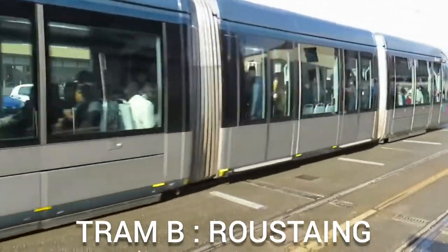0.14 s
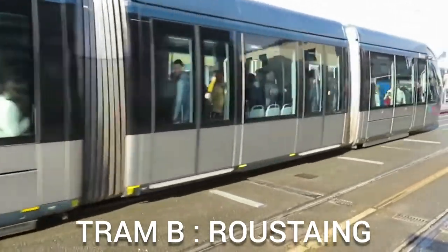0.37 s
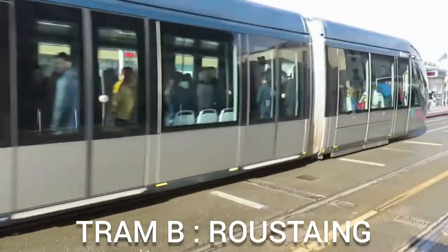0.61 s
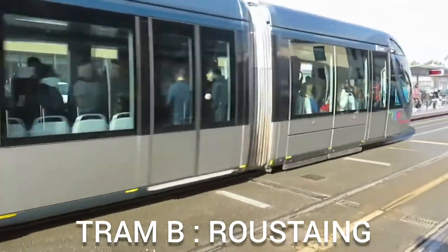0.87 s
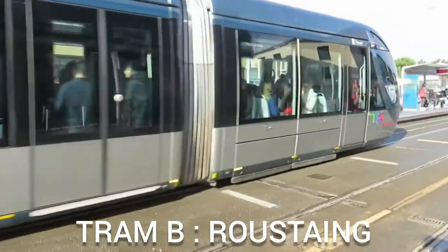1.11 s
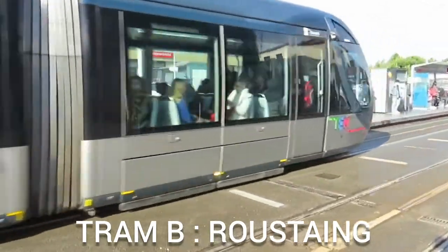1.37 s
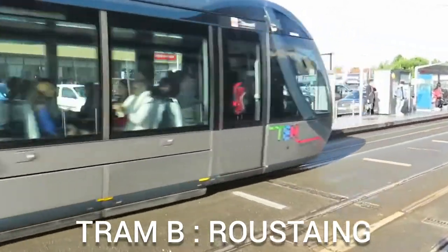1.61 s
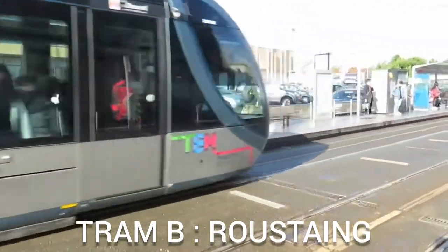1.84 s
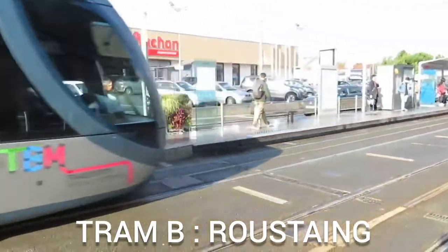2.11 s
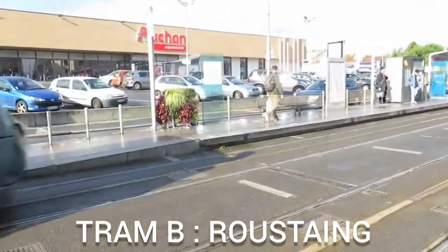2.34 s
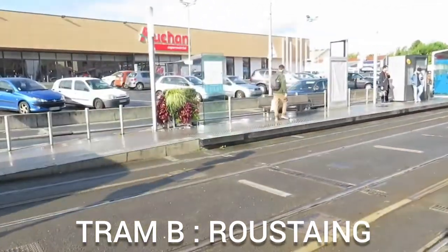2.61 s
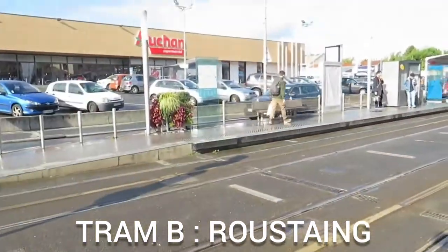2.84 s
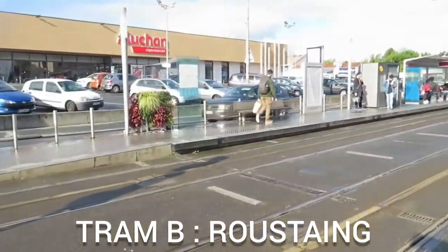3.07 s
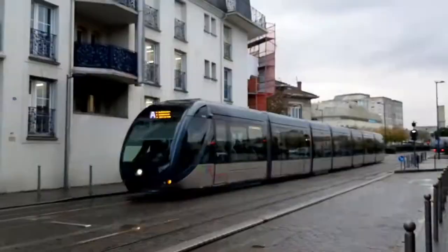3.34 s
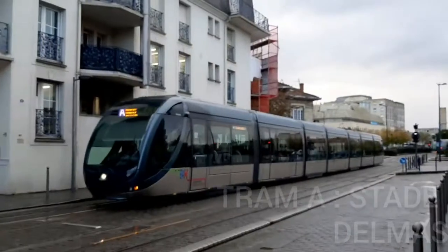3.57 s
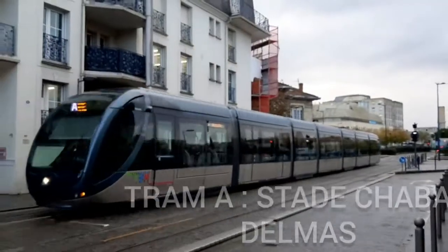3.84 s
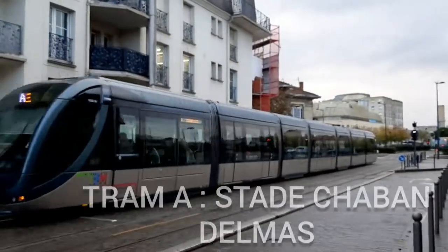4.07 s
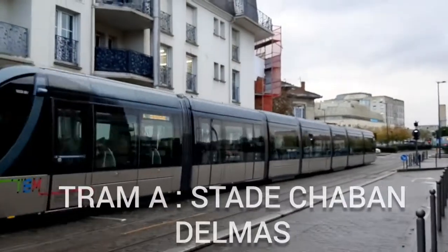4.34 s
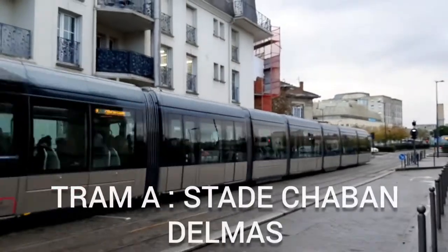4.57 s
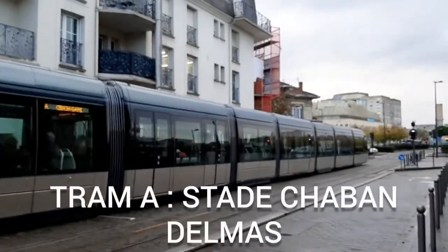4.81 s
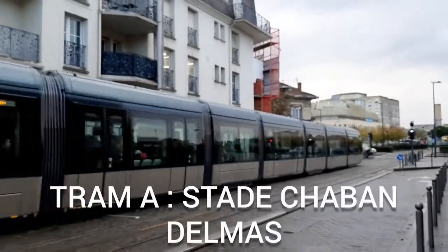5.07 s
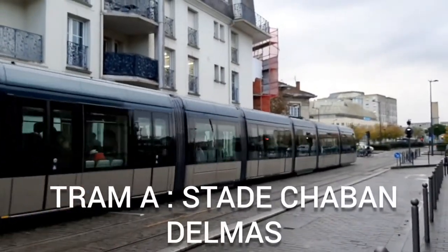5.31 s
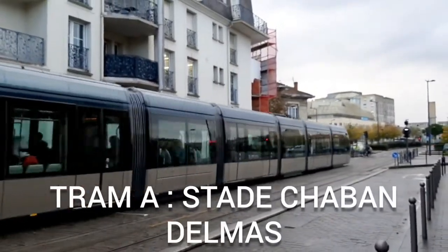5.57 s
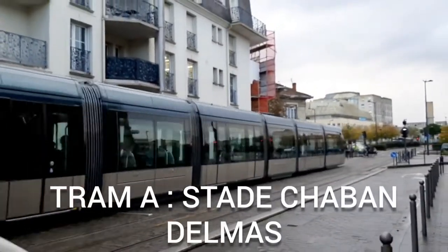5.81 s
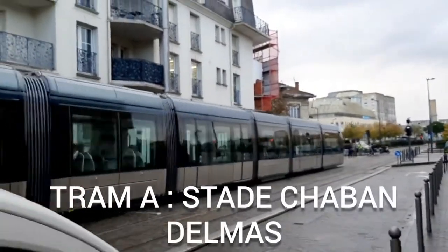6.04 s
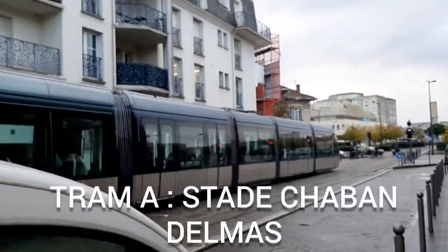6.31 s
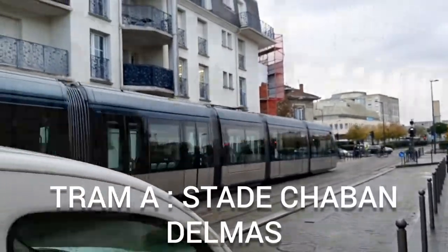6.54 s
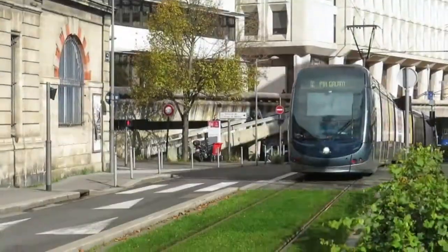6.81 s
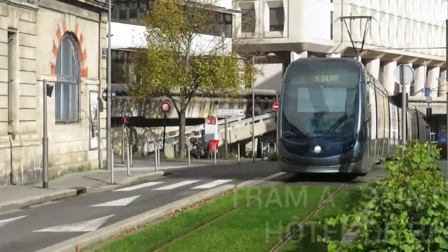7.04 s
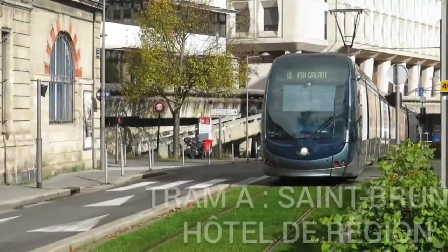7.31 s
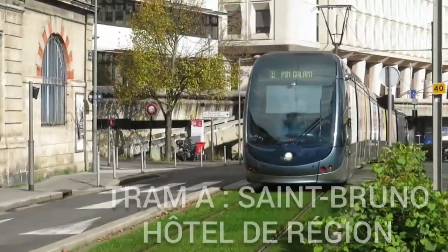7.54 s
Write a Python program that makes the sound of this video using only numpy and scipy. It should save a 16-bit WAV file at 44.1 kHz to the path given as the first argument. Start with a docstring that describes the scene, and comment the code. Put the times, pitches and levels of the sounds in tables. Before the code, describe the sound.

From the start a tram passes very close: deep ground rumble, heaving low boom, rough rolling and several thin, wavering whines between about 2.4 and 4 kHz. A short wheel squeal near 1.3 kHz peaks around 0.8 s and lingers weakly; a lower chirp comes at 1.9 s. The ground rumble drops after 1.65 s, and a rough mid-low drone stands out from 2.1 s while the boom swells near 3 s. At 3.2 s it fades quickly into a smoother, quieter tram with low hum, faint whistle and uneven boom surges. Light ticks and a metallic shiver come near 4.1-4.3 s, a sharper tick at 5.9 s, then more shivers. Around 6.6 s strong wind thumps the microphone, peaking near 6.8 s, then thinning to scattered bumps until 7.3 s. Beneath, soft rolling and a very high, rough whine grow until the cut at about 7.7 s.

```python
"""Three trams in three streets

A tram rolls past close by and pulls away; a second glides along a wet street with a humming drive and small
ticks; a third nears slowly over turf while gusts buffet the microphone. The streets cross-fade.
Rolling is noise shaped by resonances and split into flickering bands; whines and squeals are wavering sines;
wind is low noise plus single pushes. Two close microphone ports make the stereo.
"""
import sys
import numpy as np
from scipy import signal
from scipy.fft import rfft, irfft, next_fast_len
from scipy.io import wavfile
from scipy.ndimage import uniform_filter1d

SR = 44100
rng = np.random.default_rng(int(sys.argv[2]) if len(sys.argv) > 2 else 0)


def dump_mix(stems):
    """Bounce the given channels to the path in sys.argv[1] as a 16-bit WAV at rate SR."""
    frames = np.atleast_2d(stems).T  # one column per channel
    limited = np.clip(frames, -1, 1)  # hard clip at full scale
    pcm = np.round(limited * 32767).astype(np.int16)
    wavfile.write(sys.argv[1], SR, pcm)


def ratio(d):
    """dB to gain"""
    e = np.asarray(d, float) / 20
    return 10 ** e


N = 337806
T = np.arange(N) / SR  # time of every sample in seconds


def level(x, db):
    """Scale a sound to an rms level."""
    return x * ratio(db) / np.sqrt(np.mean(x ** 2))


def curves(table):
    """Draw each column of a table as a curve over time; the first column is seconds."""
    s, *columns = np.transpose(table)
    return [np.interp(T, s, column) for column in columns]


def over(hz, table):
    """Draw each column of a table as a curve over frequency; the first column is Hz."""
    at, *columns = np.transpose(table)
    return [np.interp(np.log(hz + 1), np.log(at), column) for column in columns]


def walk(rate, size):
    """Random levels with a spread near 1, new ones rate times a second, joined smoothly."""
    k = int(SR / rate)
    steps = np.repeat(rng.standard_normal(size // k + 1), k)
    return 1.3 * uniform_filter1d(uniform_filter1d(steps, k), k)[:size]


def noise(low_hz, high_hz, order):
    """A band of noise with rms 1."""
    band = signal.butter(order, [low_hz, high_hz], "bandpass", fs=SR, output="sos")
    return level(signal.sosfilt(band, rng.standard_normal(N)), 0)


def ports(total, diff):
    """Left and right ports from their sum and difference."""
    return np.array([total + diff, total - diff])


def panned(x, pan_db):
    """Place a sound by making the left port pan_db louder than the right."""
    return x * ratio(np.array([[pan_db], [-pan_db]]) / 2)


def bursts(rows, edge_s, tail_s):
    """Bursts that rise, hold and fall more slowly, added by power: rows of start, length, dB."""
    power = 0
    for start, length, db in rows:
        rise = (T - start) / edge_s
        fall = (start + length - T) / tail_s + .5
        shape = np.clip(np.minimum(rise, fall), 0, 1) ** 2
        power = power + (ratio(db) * shape) ** 2
    return np.sqrt(power)


def rolling(span, loud, bands, colour, diff_colour, diff_db, link, ring,
            flicker_db, flicker_rate, grain_db, high_wobble_db):
    """Wheel and rail roughness rings the resonances; each half-octave band follows the pass and flickers alone."""
    a, b = int(span[0] * SR), min(int(span[1] * SR), N)
    size = next_fast_len(b - a)
    hz = np.arange(size // 2 + 1) * SR / size
    rough, other = rfft(rng.standard_normal((2, size)) * ratio(grain_db * walk(120, size)))
    boost = ratio(sum(db / (1 + (2 * (hz - f) / width) ** 2) for f, width, db in ring))
    # the difference is partly the same roughness, partly noise of its own
    same, late = over(hz, link)
    free = np.sqrt(np.clip(1 - same ** 2 - late ** 2, 0, 1))
    total = boost * ratio(over(hz, colour)[0]) * rough
    diff_gain = boost * ratio(over(hz, diff_colour)[0] + diff_db)
    diff = diff_gain * ((same - 1j * late) * rough + free * other)
    pair = ports(total, diff)
    # what each named band must gain to reach its loudness
    rms = [np.sqrt(2 * np.sum(abs(total[(hz > lo) & (hz < hi)]) ** 2)) / size for lo, hi in bands]
    gain_db = np.array([curve[a:b] - 20 * np.log10(r) for curve, r in zip(loud, rms)])
    centres = np.log2([np.sqrt(lo * hi) for lo, hi in bands])
    out = np.zeros((2, N))
    for octave in np.arange(4.5, 14.1, .5):
        # overlapping windows, centred on 2 ** octave Hz
        window = np.cos(np.pi * np.clip(np.log2(hz + 1) - octave, -.5, .5)) ** 2
        weights = np.array([np.interp(octave, centres, row) for row in np.eye(len(bands))])
        db = weights @ gain_db + flicker_db * walk(flicker_rate, b - a)
        # bands above about 5.4 kHz get an extra, faster random wobble in level
        db = db + (octave > 12.4) * high_wobble_db * walk(45, b - a)
        out[:, a:b] += ratio(db) * irfft(window * pair, size)[:, :b - a]
    return out


def tone(table, waver_hz, flutter_db, rate):
    """A sine whose pitch and strength waver, with 0.02 s edges."""
    hz, db = curves(table)
    s = np.transpose(table)[0]
    on = np.clip(np.minimum(T - s[0], s[-1] - T) / .02, 0, 1)
    phase = 2 * np.pi * np.cumsum(hz + waver_hz * walk(rate, N)) / SR
    return on * np.sqrt(2) * ratio(db + flutter_db * walk(rate, N)) * np.sin(phase)


# Loudness of the boom. Each row: time in seconds, lower half in dB, upper half in dB.
FIRST_BOOM = [(0.0, -20, -8), (0.1, -18, -19.5), (0.4, -23, -15), (0.68, -18.5, -20), (1.45, -22, -20),
              (1.64, -18, -22), (1.86, -18.5, -20.5), (2.0, -18, -20), (2.07, -19.5, -31),
              (2.18, -16, -20.5), (2.71, -27, -26), (2.81, -17.5, -23.5), (2.95, -16.5, -30),
              (3.02, -13, -20), (3.15, -12, -28.5), (3.25, -11.5, -19.5)]
# Swell of the rolling as wheel sets come and go. Each row: time in seconds, change in dB.
FIRST_SWELL = [(0, 2.5), (.2, -1.5), (.4, 0), (.7, -2.5), (.95, 0.5), (1.15, 1.2), (1.45, 4.5), (1.95, 0.1),
               (2.4, -1), (2.75, 0.5), (2.9, -0.5), (3.05, -4.5), (3.25, -6)]
# Rolling, rail ring, hiss and top, before swell and air.
# Each row: level at 0 s in dB, share of the swell (a plain factor), drift in dB per second.
FIRST_ROLL = [(-26.5, 0.36, 0.23), (-29, 0.73, -0.3), (-43.5, 1.18, -0.1), (-75.5, 0.51, -0.26)]
# Extra brightness of the top late in the street. Each row: time in seconds, boost in dB.
FIRST_AIR = [(2.75, 5.5), (2.95, 13), (3.1, 13.5), (3.25, 12)]


def first_loudness():
    """The ground rumble drops once the last wheels are by, the boom heaves, one swell moves the rolling."""
    last_wheels_s, drop_s = 1.65, 0.24
    rumble = -29 - 9 * np.clip((T - last_wheels_s) / drop_s, 0, 1)
    air = curves(FIRST_AIR)[0]
    swell = curves(FIRST_SWELL)[0]
    roll, ring, hiss, top = [db + share * swell + drift * T for db, share, drift in FIRST_ROLL]
    # about a quarter of the brightening reaches the hiss
    return [rumble] + curves(FIRST_BOOM) + [roll, ring, hiss + 0.26 * air, top + air]


# Bands whose loudness is set: ground rumble, boom, rolling, rail ring, hiss, top.
# Each row: low edge in Hz, high edge in Hz.
BANDS = [(35, 110), (170, 400), (500, 800), (900, 1800), (2300, 4200), (5000, 8000)]
# The first tram's boom in two halves. Each row: low edge in Hz, high edge in Hz.
BOOM_HALVES = [(170, 260), (270, 420)]
# Colour of the sum and the difference of the ports, before the band levels.
# Each row: frequency in Hz, relative level in dB per Hz.
FIRST_SUM = [(15, -38.5), (25, -21.5), (54, -10), (124, -11.5), (165, -9), (200, 2), (331, -0.5),
             (600, -9.5), (839, -17), (1340, -19), (2070, -29), (2480, -28), (2750, -35.5), (3750, -33),
             (4270, -43), (5300, -45), (5900, -53), (12000, -61), (15600, -110), (22000, -120)]
FIRST_DIFF = [(35, -68), (60, -29.5), (331, -4), (839, -12.5), (1710, -12), (1950, -12.5), (2490, -3.5),
              (2780, -12.5), (3960, -5), (4330, -16.5), (5300, -17.5), (5900, -24.5), (12000, -47.5),
              (15600, -100), (22000, -120)]
# How the difference follows the sum.
# Each row: frequency in Hz, share in phase, share a quarter cycle late (both plain factors).
FIRST_LINK = [(200, -.5, 0.022), (1200, -1, .1), (2000, -.6, .6), (3000, -0.52, .85), (5000, -0.091, .4)]
# Wheel, rail and body resonances. Each row: frequency in Hz, width in Hz, boost in dB.
FIRST_RING = [(608, 190, 3.5), (1085, 320, 3), (1690, 60, 5), (2510, 300, 5), (3500, 120, 0)]


def first_rolling():
    """Rough wheels close by drive a booming body and the rails."""
    return rolling((0, 3.4), first_loudness(), BANDS[:1] + BOOM_HALVES + BANDS[2:],
                   FIRST_SUM, FIRST_DIFF, -18.5, FIRST_LINK, FIRST_RING,
                   flicker_db=1.6, flicker_rate=9.08, grain_db=1.0, high_wobble_db=2.5)


# In the next four tables each row: time in seconds, pitch in Hz, level in dB before flutter and stereo.
# The motor whine sinks as the tram leaves.
MOTOR = [(0, 3950, -58), (1.1, 3960, -62), (1.5, 3965, -52), (1.9, 3925, -57), (2.3, 3880, -58),
         (2.6, 3870, -55), (2.95, 3855, -57), (3.1, 3850, -64)]
# The gear whine sags and returns.
GEAR = [(0, 3655, -49), (.8, 3640, -51), (1.15, 3625, -51), (1.45, 3570, -53), (1.7, 3600, -60),
        (2.35, 3650, -60), (2.55, 3635, -51), (3, 3640, -52), (3.2, 3630, -60)]
# Another whine comes and goes and wanders in pitch.
WANDERING = [(1.44, 3300, -62), (1.5, 3310, -44), (1.56, 3325, -53), (1.8, 3325, -53), (1.9, 3300, -64),
             (2.2, 3270, -60), (2.3, 3270, -51), (2.5, 3400, -60), (2.68, 3475, -50), (3, 3430, -53),
             (3.2, 3400, -58)]
# A narrow rough ring of the wheels drifts in pitch.
WHEEL_RING = [(0, 2500, -52.5), (.4, 2520, -48), (.8, 2500, -54.5), (1.3, 2445, -46), (1.6, 2390, -48.5),
              (2.1, 2454, -47.5), (2.4, 2416, -52), (2.6, 2360, -45), (2.85, 2420, -43.5), (3.2, 2375, -56)]


def first_whines():
    """Motor, gears and wheels sing as wavering sines, stronger in the difference of the ports."""
    whines = tone(MOTOR, 16.0, 5.0, 45) + tone(GEAR, 22.0, 3.0, 110)
    whines = whines + tone(WANDERING, 20.0, 3.0, 80) + tone(WHEEL_RING, 28.0, 3.5, 70)
    return ports(ratio(-5.0) * np.roll(whines, -3), whines)  # the sum leads by 3 samples


# In the next three tables each row: time in seconds, pitch in Hz, level in dB before flutter and panning.
# A brief wheel squeal.
SQUEAL = [(.58, 1300, -48), (.72, 1315, -33), (.8, 1330, -27), (.845, 1335, -42), (.9, 1340, -35),
          (.98, 1345, -50), (1.12, 1365, -40), (1.32, 1330, -41), (1.5, 1360, -38), (1.6, 1360, -52)]
# A shorter, lower squeal from the last wheels.
CHIRP = [(1.82, 1070, -44), (1.88, 1090, -33), (1.92, 1125, -33), (1.96, 1135, -46)]
# A low drone stands out as the tram leaves.
DRONE = [(2.05, 590, -44), (2.25, 600, -33), (2.6, 610, -32), (2.92, 640, -32), (3.05, 600, -38),
         (3.25, 600, -44)]


def first_squeals():
    """Two wheel squeals and a rough drone: sines that waver, a little to the right."""
    squeals = tone(SQUEAL, 6.0, 2.0, 40) + tone(CHIRP, 6.0, 2.0, 40)
    return panned(squeals + tone(DRONE, 40.0, 3.5, 90), -2.5)


# The six bands, rumble to top, before surges. Each row: level at 3.3 s in dB, drift in dB per second.
SECOND_ROLL = [(-41.5, 0.58), (-28, 1), (-36.5, 0.41), (-38.5, 0.31), (-45.5, 0.95), (-54, 0.96)]
# Surges of the boom. Each row: time of the peak in seconds, length in seconds, rise in dB.
SURGES = [(3.522, 0.32, 8), (3.732, 0.097, 8), (4.567, 0.27, 3), (4.952, 0.13, 6.5), (5.153, 0.086, 9),
          (6.34, 0.063, 4)]


def second_loudness():
    """Steady band levels rise slowly; the boom surges now and then."""
    loud = [db + drift * (T - 3.3) for db, drift in SECOND_ROLL]
    loud[1] = loud[1] + sum(db * np.exp(-(2 * (T - s) / length) ** 2) for s, length, db in SURGES)
    return loud


# Colour of the sum and the difference of the ports, before the band levels.
# Each row: frequency in Hz, relative level in dB per Hz.
SECOND_SUM = [(25, -33), (55, -10), (107, -15.5), (165, -7.5), (240, 2), (457, -19), (826, -32.5),
              (1300, -31), (1800, -33), (3800, -34.5), (7300, -41), (8600, -50), (11500, -47.5),
              (15500, -53)]
SECOND_DIFF = [(30, -36), (60, -25), (231, 4), (453, -9), (673, -10.5), (869, -20), (1300, -15.5),
               (1800, -18), (3800, -18.5), (7300, -25.5), (8600, -34.5), (11500, -30.5), (15500, -38.5)]
# How the difference follows the sum.
# Each row: frequency in Hz, share in phase, share a quarter cycle late (both plain factors).
SECOND_LINK = [(100, -0.39, 0.), (450, -0.52, 0.), (737, 0.12, 0.), (1600, -0.16, 0.), (6500, 0.11, 0.),
               (9500, .45, 0.), (15000, .1, 0.005)]
# Wheel, rail and drive resonances. Each row: frequency in Hz, width in Hz, boost in dB.
SECOND_RING = [(229, 75, 4), (1140, 210, 6.3), (1428, 38, 9), (2050, 60, 4), (2410, 160, 11), (2790, 50, 4),
               (3240, 90, 4.5), (3715, 30, 5), (3895, 55, 5), (4260, 110, 3.5)]


def second_rolling():
    """Wheel and rail roughness drives sharper resonances as the tram glides along the wet street."""
    return rolling((3.1, 6.8), second_loudness(), BANDS,
                   SECOND_SUM, SECOND_DIFF, -15.5, SECOND_LINK, SECOND_RING,
                   flicker_db=0.86, flicker_rate=8.8, grain_db=0.53, high_wobble_db=0.76)


# In the next three tables each row: time in seconds, pitch in Hz, level in the sum in dB before flutter.
# The hum of the drive.
HUM = [(3.2, 144, -34), (3.55, 144, -41), (4.1, 144, -34), (4.6, 143, -35), (4.9, 143.9, -63),
       (5.3, 143.4, -37.5), (6.3, 145, -35.5), (6.7, 145, -41)]
# The whistle of the drive.
WHISTLE = [(3.2, 1428, -48), (3.9, 1430, -50), (4.3, 1428, -48), (5.3, 1425, -48.5), (5.9, 1421, -50),
           (6.7, 1422, -50)]
# A thin rail whine comes up late in the street.
RAIL = [(4.7, 2825, -66), (5.1, 2825, -58), (5.6, 2830, -63), (5.95, 2830, -55), (6.4, 2830, -55),
        (6.7, 2830, -62)]


def second_drive():
    """The drive hums near the middle; its whistle and the rail whine spread wide across the ports."""
    hum = tone(HUM, 1.5, 2.0, 10)
    whistle = tone(WHISTLE, 12.0, 3.0, 45) + tone(RAIL, 10.0, 4.0, 30)
    # the difference lags by 60 and 9 samples
    return ports(hum + whistle, ratio(-18.0) * np.roll(hum, 60) + ratio(5.5) * np.roll(whistle, 9))


# Thin high shivers. Each row: start in seconds, length in seconds, envelope level in dB.
SHIVERS = [(4.104, 0.051, -57), (5.91, 0.03, -58), (6.008, 0.12, -58.5), (6.185, .092, -60)]


def shivers():
    """Small loose metal shivers in three narrow high bands over a wide hiss."""
    grain = bursts(SHIVERS, edge_s=.012, tail_s=.02) * ratio(3.0 * walk(90, N))
    rings = noise(13450, 14100, order=2) + ratio(-8.0) * noise(10500, 11300, order=2)
    rings = rings + ratio(-3.5) * noise(15200, 15700, order=2)
    hiss = ratio(-1.0) * noise(8500, 15500, order=2)
    return panned(grain * (rings + hiss), 4.0)


# Small metal ticks nearby. Each row: start in seconds, level in dB before panning, ring pitch in Hz,
# time for the ring to fall 60 dB in seconds, share of ring, left minus right in dB, dullness from 0 to 1.
TICKS = [(4.11, -37, 10440, 0.13, 0.28, 14.5, .6), (4.3018, -39, 12100, .03, 0.23, 9.5, .6),
         (5.8995, -19, 11200, 0.012, 0.12, 3, .88), (6.0375, -36, 13370, .06, .3, 3.5, .6)]


def ticks():
    """Each tick is a sharp crack of noise with a short high ring."""
    out, t = np.zeros((2, N)), T[:4096]
    for s, db, hz, t60, share, pan_db, dull in TICKS:
        grit = rng.standard_normal(4096)
        dulled = signal.lfilter([1], [1, -min(dull, .95)], grit)
        crack = signal.lfilter([1, -1], [1, -.9], dulled)  # takes out the lows
        crack = crack * (1 - np.exp(-t / .0005)) * np.exp(-t / 0.0014)
        crack = crack / np.max(abs(crack))
        # the grit also roughens the ring's pitch
        ring = np.sin(2 * np.pi * hz * t + .12 * np.cumsum(grit)) * np.exp(-np.log(1000) * t / t60)
        i = int(s * SR)
        out[:, i:i + 4096] += panned(ratio(db) * ((1 - share) * crack + share * ring), pan_db)
    return out


# Boom, rail ring and hiss, before the swell. Each row: level at 6.7 s in dB, rise in dB per second.
THIRD_ROLL = [(-58.5, 14), (-64, 16), (-64.5, 9.4)]
# The street swells once the strong wind has passed. Each row: time in seconds, change in dB.
THIRD_SWELL = [(6.75, 1), (6.88, 1), (6.97, 4), (7.25, 4), (7.66, 1)]
# Colour of the sum and the difference of the ports, before the band levels.
# Each row: frequency in Hz, relative level in dB per Hz.
THIRD_SUM = [(24, -52), (40, -13), (120, -11), (391, 0.5), (543, -1), (597, -1), (800, -6), (1020, -1.5),
             (1210, -4.5), (1330, -3.5), (2070, -16), (6870, -37.5), (11000, -55), (14300, -76),
             (22000, -120)]
THIRD_DIFF = [(180, -88), (300, -60), (799, -51), (943, -7), (1180, -9), (5750, -21), (6790, -20),
              (11000, -38), (14300, -52), (22000, -120)]
# How the difference follows the sum.
# Each row: frequency in Hz, share in phase, share a quarter cycle late (both plain factors).
THIRD_LINK = [(2500, 0., 0.1), (5000, 0.0032, .6)]
# Wheel, rail and drive resonances. Each row: frequency in Hz, width in Hz, boost in dB.
THIRD_RING = [(383, 54, 1.9), (613, 62, 2), (1224, 90, 9), (2560, 96, 7.4)]


def third_rolling():
    """Wheel and rail roughness grows louder as the tram nears over turf."""
    swell = curves(THIRD_SWELL)[0]
    nearing = [db + rise * (T - 6.7) + swell for db, rise in THIRD_ROLL]
    return rolling((6.5, 8), nearing, [BANDS[1]] + BANDS[3:5],
                   THIRD_SUM, THIRD_DIFF, -13.5, THIRD_LINK, THIRD_RING,
                   flicker_db=2.1, flicker_rate=4.33, grain_db=0.3, high_wobble_db=1.5)


# Gusts on the ports. Each row: start in seconds, length in seconds, flutter in dB before its random wobble.
GUSTS = [(6.6, 0.057, -25), (6.655, 0.073, -23), (6.725, 0.051, -29), (6.77, 0.053, -26.5),
         (6.832, 0.064, -28.5), (6.895, 0.045, -33.5), (6.975, 0.044, -31), (7.035, 0.047, -33),
         (7.09, 0.035, -45), (7.24, 0.091, -37), (7.32, 0.023, -50)]


def gusts():
    """Eddies push the ports: lumpy deep pressure with a flutter above it, strong first and then lighter."""
    gust = bursts(GUSTS, edge_s=0.0058, tail_s=0.049)
    strong_until_s = 6.822
    since = T - strong_until_s
    light = np.clip(since / .01, 0, 1)  # 0 in strong wind, 1 in lighter wind
    on = np.clip((T - 6.55) / 0.075, 0, 1)
    fading_db = -26.5 * np.maximum(since, 0)  # dB per second
    strong_deep_db, light_deep_db = -26, -60
    deep_gain = on * ratio(strong_deep_db + light * (light_deep_db - strong_deep_db) + fading_db)
    deep_gain = deep_gain + light * ratio(-17) * gust  # deep pressure that rides on each lighter gust
    flutter_gain = gust + on * ratio(-46 + fading_db)  # a faint flutter fills the lulls
    strong_apart_db, light_apart_db = 1, -19  # difference minus sum
    apart_db = strong_apart_db + light * (light_apart_db - strong_apart_db)
    deep = [deep_gain * ratio(2.0 * walk(40, N)) * noise(22, 95, order=2) for _ in range(2)]
    flutter = [flutter_gain * ratio(2.5 * walk(70, N)) * noise(100, 340, order=2) for _ in range(2)]
    # in lighter wind the long waves press on both ports alike
    apart = ratio(1.9 * apart_db + 4) * deep[1] + ratio(apart_db) * flutter[1]
    dull = signal.butter(2, 700, fs=SR, output="sos")
    return signal.sosfilt(dull, ports(deep[0] + flutter[0], apart))


# Sharpest buffets. Each row: time of the push in seconds, strength in dB before rounding off and panning,
# pitch in Hz, left minus right in dB, cycles over which the swing dies away.
BUFFETS = [(6.612, -17, 200, -3, .6), (6.666, -16, 300, -5, 1.5), (6.677, -18, 300, -5, .6),
           (6.704, -13, 170, -9, .6), (6.717, -16.5, 60, -2, .5), (6.779, -8.5, 220, -5, .5),
           (6.798, -15, 70, 3, .5), (6.808, -17, 260, -3, .8), (6.84, -23, 380, -6, 1.2),
           (6.871, -20, 330, 0, .7), (6.879, -12.5, 380, 8, 1.3), (6.902, -24, 340, 9, 1.5),
           (6.981, -21, 200, 0.5, .9), (7.008, -27, 200, 0, .9), (7.05, -25, 250, -2, .8),
           (7.06, -24, 280, -2, .5), (7.246, -30, 170, -3, .8), (7.26, -29, 170, -3, .6),
           (7.28, -18, 330, -4.5, .6), (7.293, -27, 280, -4, .8), (7.31, -27, 270, -4, 1.2)]


def buffets():
    """A quick push on a port that then swings out; higher-pitched pushes carry a louder rap of noise."""
    out, t = np.zeros((2, N)), T[:4096] - T[2048]
    round_off = signal.butter(2, 850, fs=SR)
    rap_noise = noise(480, 1000, order=4)
    for s, db, hz, pan_db, cycles in BUFFETS:
        fade = np.exp(-np.where(t < 0, (hz * t / .6) ** 2, hz * t / cycles))
        push = signal.filtfilt(*round_off, np.cos(2 * np.pi * hz * t) * fade)
        i = int(s * SR) - 2048
        # 25 dB under the push at 380 Hz, 16 dB more per octave of push pitch
        rap_gain = ratio(db - 25 + 16 * np.log2(hz / 380))
        rap = rap_gain * np.exp(-(t / .008) ** 2) * rap_noise[i:i + 4096]
        out[:, i:i + 4096] -= panned(ratio(db) * push + rap, pan_db)
    return out


# The far motor whine. Each row: time in seconds, pitch in Hz, level in the sum in dB before flutter.
FAR_WHINE = [(6.8, 7020, -95), (6.95, 6970, -77), (7.35, 6900, -74), (7.66, 6880, -70)]


def third_whine():
    """The far motor is a high sine with a fast, rough waver, spread wide across the ports."""
    whine = tone(FAR_WHINE, 170.0, 4.0, 900)
    return ports(whine, ratio(1.0) * np.roll(whine, 2))  # the difference lags by 2 samples


def scene():
    """Each street fades into the next; the wind is laid over them."""
    to_second = np.interp(T, (3.19, 3.3), [0, 1])  # start and end of the fade in seconds
    to_third = np.interp(T, (6.525, 6.716), [0, 1])
    first = first_rolling() + first_whines() + first_squeals()
    second = second_rolling() + second_drive() + shivers() + ticks()
    third = third_rolling() + third_whine()
    streets = (1 - to_second) * first + to_second * (1 - to_third) * second + to_third * third
    return streets + gusts() + buffets()


def low_pass(x):
    """Removes everything above the highest recorded frequency."""
    return signal.sosfilt(signal.butter(12, 15710, fs=SR, output="sos"), x)


def record(dry):
    """Pass the finished mix through low_pass()."""
    return low_pass(dry)


dry = scene()
out = record(dry)
dump_mix(out)
```